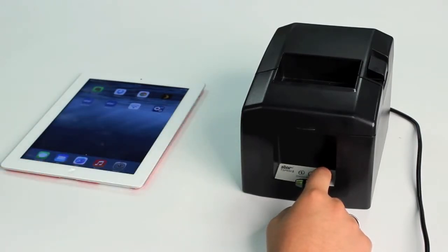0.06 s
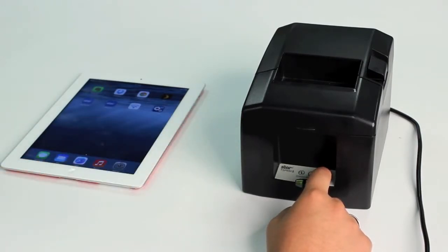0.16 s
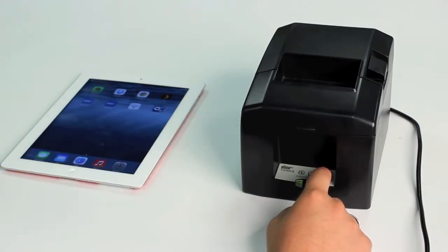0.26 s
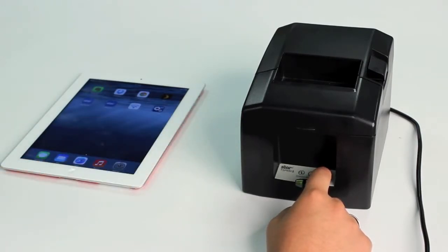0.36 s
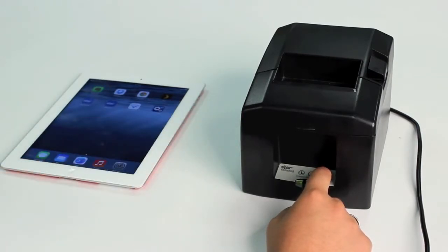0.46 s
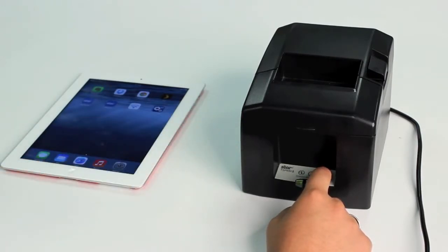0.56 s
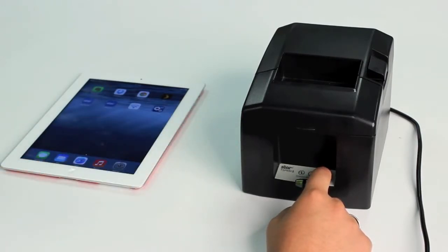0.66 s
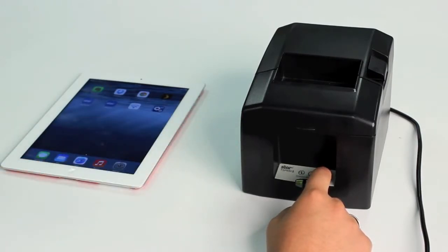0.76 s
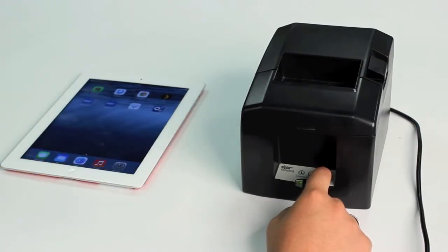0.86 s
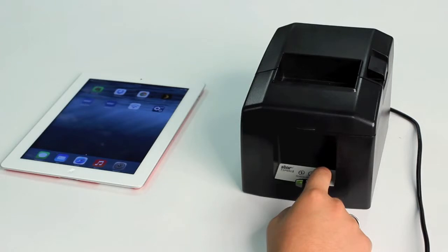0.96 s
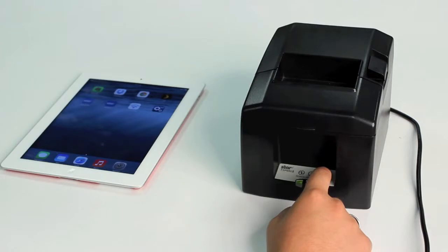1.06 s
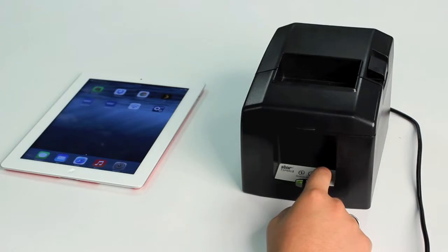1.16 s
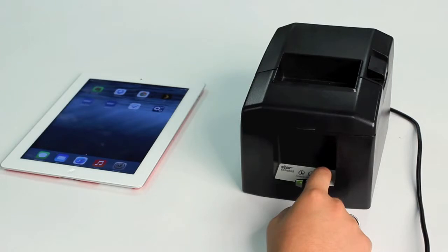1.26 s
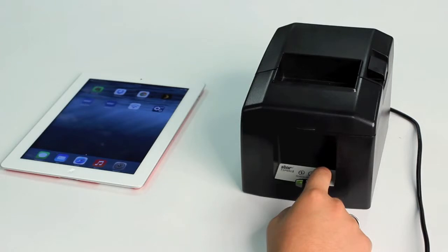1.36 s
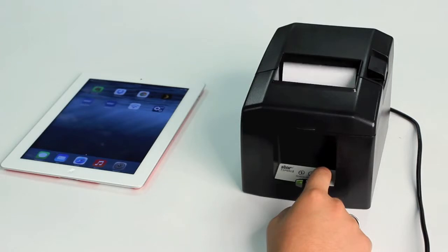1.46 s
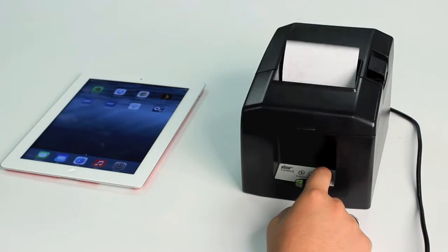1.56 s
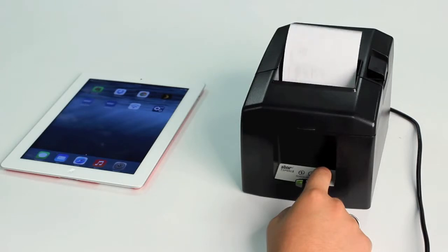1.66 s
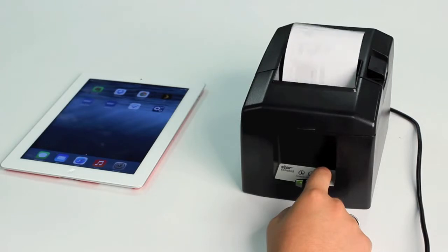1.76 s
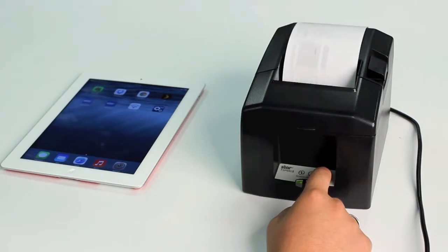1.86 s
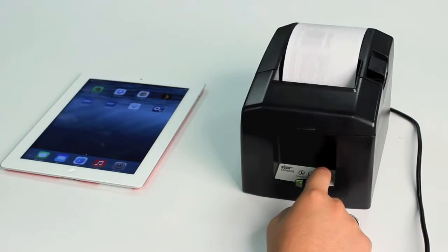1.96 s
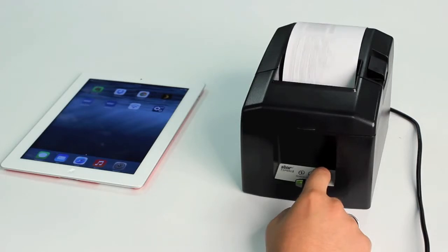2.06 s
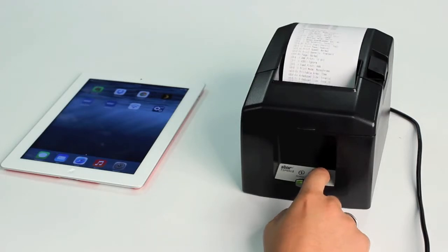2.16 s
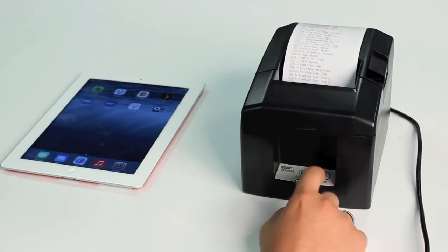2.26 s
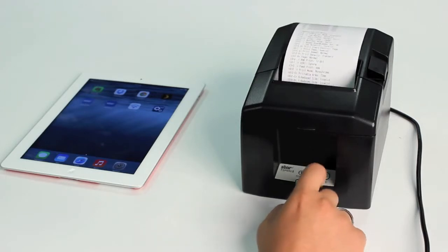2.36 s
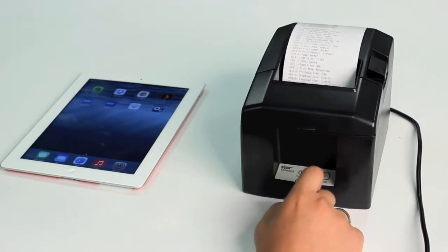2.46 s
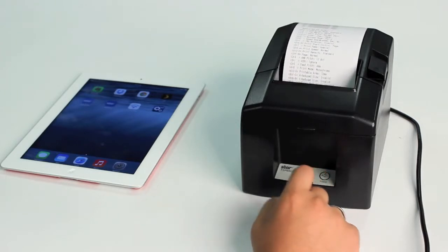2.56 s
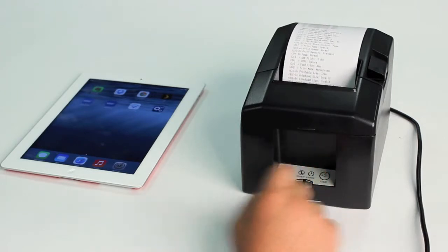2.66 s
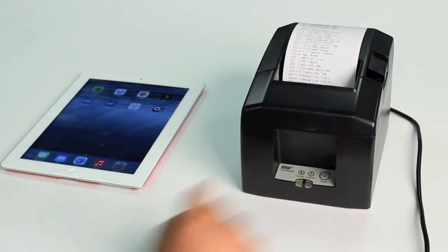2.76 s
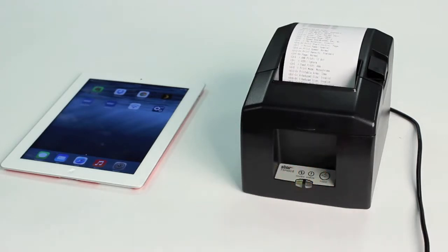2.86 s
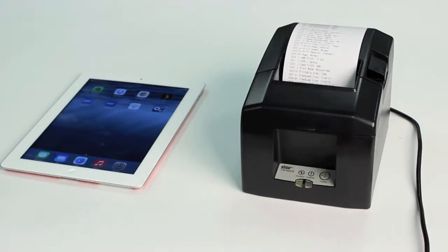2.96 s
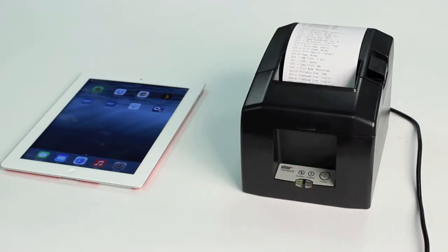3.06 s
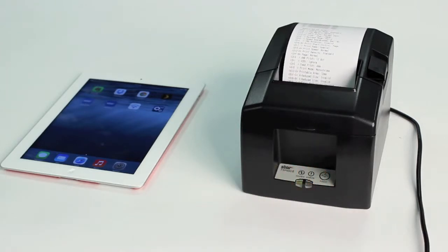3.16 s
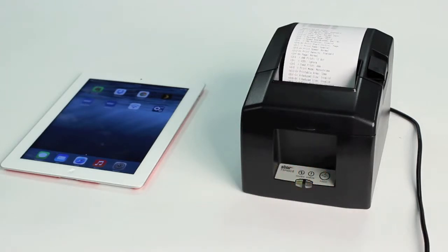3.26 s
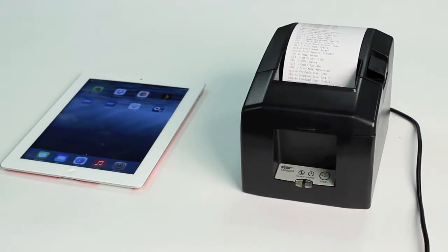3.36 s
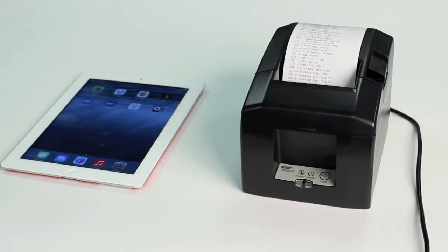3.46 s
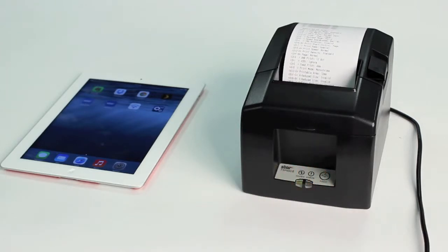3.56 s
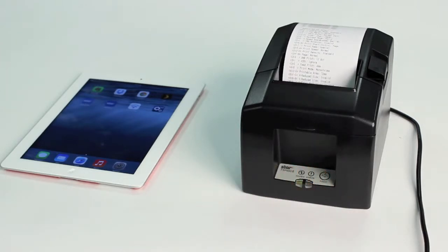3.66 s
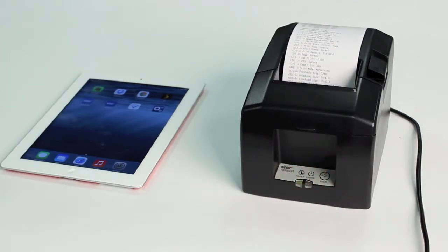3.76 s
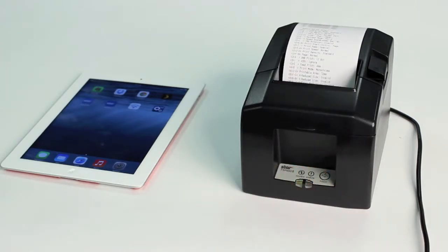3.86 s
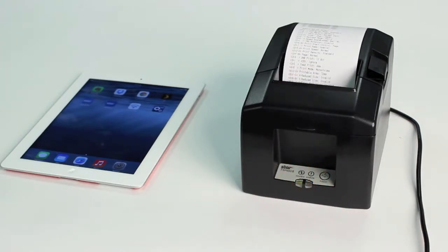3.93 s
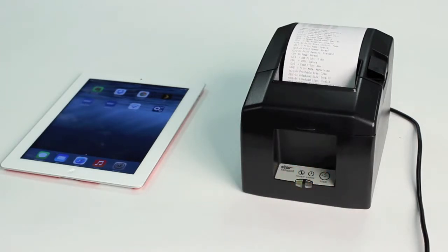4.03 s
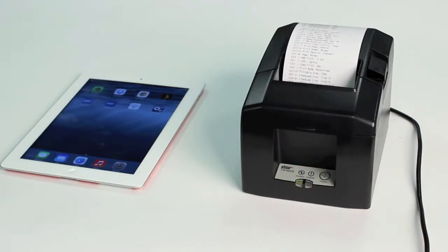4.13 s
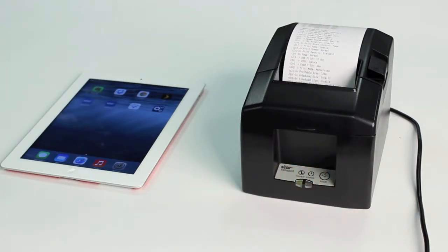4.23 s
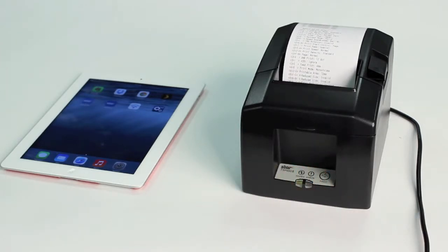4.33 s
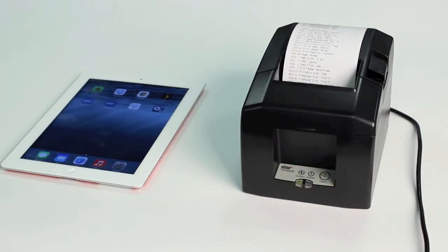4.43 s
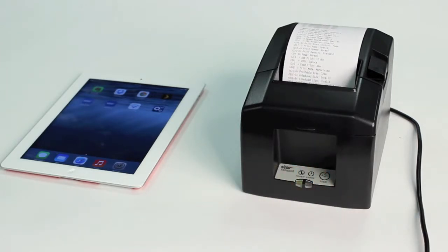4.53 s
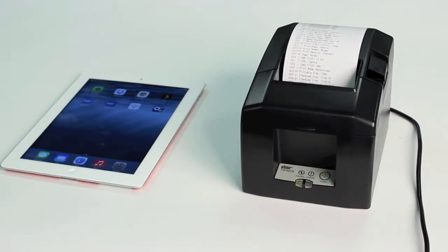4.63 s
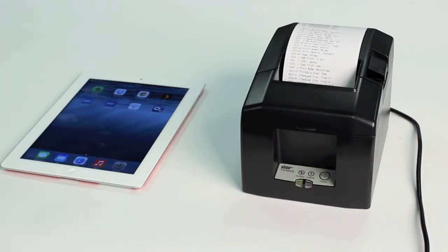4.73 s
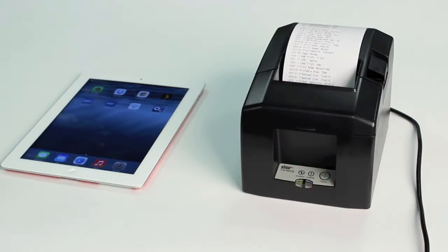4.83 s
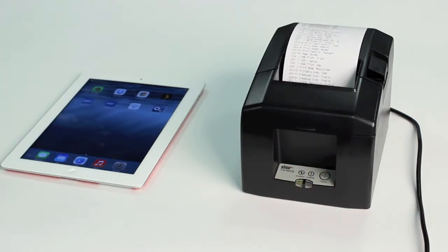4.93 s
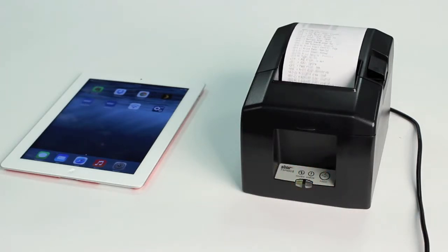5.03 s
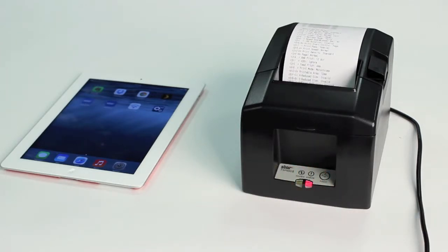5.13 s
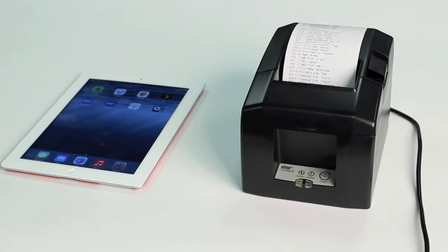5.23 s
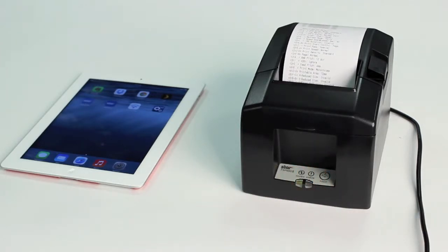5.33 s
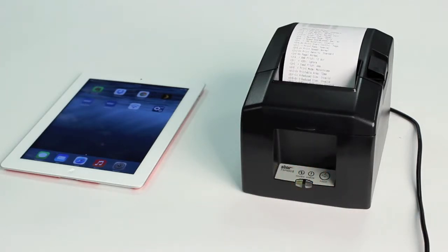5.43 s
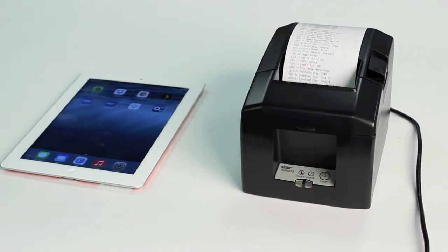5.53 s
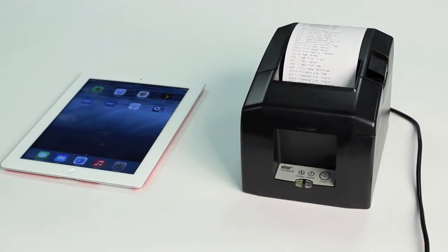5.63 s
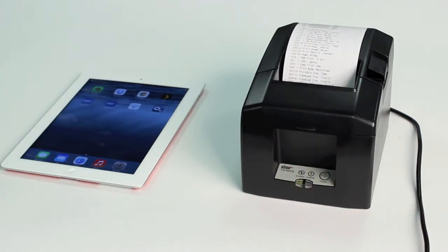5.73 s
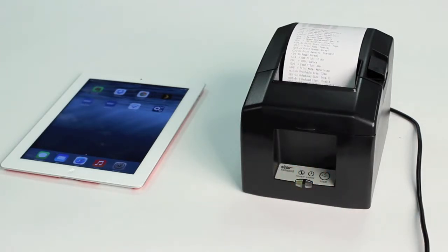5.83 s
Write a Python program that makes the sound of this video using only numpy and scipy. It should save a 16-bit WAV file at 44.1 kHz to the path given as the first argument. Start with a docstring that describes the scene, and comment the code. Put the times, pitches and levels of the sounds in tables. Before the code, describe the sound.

A receipt printer is heard close up on a desk in a small, lightly reflective room, over low ventilation rumble, faint hiss and mains hum. At 0.33 and 0.6 seconds the cutter gives short, metallic geared whirs with clatter. Four brief buzzing feed jogs clack from 0.87 to 1.2. At 1.42 the stepper motor starts with a rough shudder and tiny squeak, rises quickly, and by 1.6 holds a high, raspy whine; it swells in uneven print bursts over airy paper hiss, then slows sharply from 2.2 to 2.33. The blade whirs and crunches through paper at 2.4 and rubs back, with hard bright snaps near 2.55. Faint clatters at 2.74 and 3.13 surround a soft desk bump at 2.87. Quiet hum remains until cutter whirs at 4.3 and 4.56, then buzzing jogs and loud sharp snaps from 4.85 to 5.17, fading into room tone.

```python
"""A thermal receipt printer on a desk in a small room runs its self-test.
The cutter whirs out and back and the feed motor jogs with sharp clacks; the motor runs up and whines as a page
prints. The blade crosses the paper, and after a pause the start-up whirs and clacks come again.
Motors are tones and tooth-rate noise locked to their steps; paper is shaped noise; blows are noise bursts with
casing modes. A room adds reflections; ventilation and mains hum lie behind."""
import sys
import numpy as np
from scipy import signal
from scipy.fft import rfft, irfft
from scipy.io import wavfile

SR = 44100
rng = np.random.default_rng(int(sys.argv[2]) if len(sys.argv) > 2 else 0)


def bounce(signal):
    """Save signal as a 16-bit WAV file at the path given by the first command-line argument."""
    frames = np.transpose(np.atleast_2d(signal))
    limited = np.clip(frames, -1, 1)
    pcm = np.round(limited * 32767).astype(np.int16)
    wavfile.write(sys.argv[1], SR, pcm)


N = 259749
TIME = np.arange(N) / SR

# cutter motor strokes: (start [s], length [s], whir level [dB], hum level [dB], 0 forward or 1 back)
CUTS = [(0.334, 0.081, -33, -33, 0), (0.592, 0.073, -35, -30, 1), (2.326, 0.059, -39.5, -37.5, 1),
        (2.391, 0.0994, -29.5, -40.5, 0), (2.505, 0.14, -35, -38.5, 1), (4.299, 0.091, -34, -58, 0),
        (4.562, 0.069, -34, -32.5, 1)]


def amp(db):
    """Decibels to gain."""
    return 10 ** (np.asarray(db) / 20)


def unit(x):
    """Scales to rms 1."""
    return x / np.sqrt(np.mean(x ** 2) + 1e-20)


def read(points, hz):
    """Reads a spectrum table on a log-frequency axis."""
    f, value = np.transpose(points)
    return np.interp(np.log(hz + 1), np.log(f + 1), value)


def add(mix, s, sound):
    """Mixes a sound in at time s."""
    part = mix[round(s * SR):][:len(sound)]
    part += sound[:len(part)]


def colour(x, points, size=4096):
    """Causal minimum-phase filter with the given spectrum shape; white noise keeps its power."""
    gain = unit(amp(read(points, abs(np.fft.fftfreq(size, 1 / SR)))))
    log_response = np.conj(signal.hilbert(np.log(gain + 1e-5)))
    taps = np.fft.ifft(np.exp(log_response)).real
    return signal.oaconvolve(x, taps[:size // 2])[:len(x)]


def drift(rate_hz):
    """Slow random wander of rms 1: noise under a Gaussian low-pass."""
    lowpass = np.exp(-(np.fft.rfftfreq(N, 1 / SR) / rate_hz) ** 2)
    return unit(irfft(rfft(rng.standard_normal(N)) * lowpass, N))


def resonate(x, hz, width_hz):
    """One resonance, scaled to rms 1."""
    radius = np.exp(-np.pi * width_hz / SR)
    pole = radius * np.exp(2j * np.pi * hz / SR)
    return unit(signal.lfilter([1], [1, -pole], x).real)


def ring(modes, t):
    """Dying modes after a blow."""
    return sum(amp(db - 60 * t / t60_s) * np.sin(2 * np.pi * (hz * t + rng.random()))
               for hz, db, t60_s in modes)


def gate(t, length, rise, fall):
    """Builds up, holds for a length, then dies away."""
    build_up = 1 - np.exp(-np.maximum(t, 0) / rise)
    return build_up * np.exp(-np.maximum(t - length, 0) / fall)


def ramp(start, length):
    """Goes from 0 to 1 over a length of time."""
    return np.clip((TIME - start) / length, 0, 1)


def teeth(turns, sharp):
    """A puff of noise each time a tooth meets the next."""
    return unit(np.exp(-sharp * (turns % 1))) * rng.standard_normal(len(turns))


def step_tones(tones, steps, level_wander_db, level_hz, phase_wander_rad, phase_hz):
    """Tones locked to the motor steps, each wavering in level and phase."""
    return sum(amp(db + level_wander_db * drift(level_hz)) * np.sqrt(2)
               * np.sin(2 * np.pi * k * steps + phase_wander_rad * drift(phase_hz)) for k, db in tones)


def motor_whine(steps, speed):
    """Step tones under load, swelled by each print block; the housing sings most near the full step rate."""
    # whine with sidebands of the 32-step print cycle: (frequency [cycles/step], relative level [dB])
    whine_tones = [(20 / 24, -15), (31 / 32, -10), (32 / 32, -0.57), (28 / 24, -15), (38 / 32, -29),
                   (43 / 32, -29), (44 / 32, -19), (64 / 32, -14.5), (65 / 32, -27), (95 / 32, -23),
                   (96 / 32, -29), (97 / 32, -24)]
    # blocks of print: (start [s], length [s], level [dB])
    print_blocks = [(1.644, 0.044, -31), (1.761, 0.12, -24.5), (1.887, 0.18, -23), (2.095, 0.11, -21),
                    (2.212, 0.039, -13)]
    rise_s, fall_s, blank_db = 0.021, 0.017, -46
    printing = amp(blank_db) + sum(amp(db) * gate(TIME - s, length, rise_s, fall_s)
                                   for s, length, db in print_blocks)
    in_tune = .14 + .86 * np.exp(-(1 - speed) / .06)
    return printing * in_tune * step_tones(whine_tones, steps, 3.7, 120, 0.088, 71)


def gear_tones(steps, speed):
    """Gears and platen sound at fractions of the step rate, growing with the cube of speed."""
    # gears and platen: (frequency [cycles/step], relative level [dB])
    mesh_tones = [(6 / 32, -45.5), (7 / 24, -35.5), (7 / 18, -46), (12 / 24, -43), (14 / 24, -42.5),
                  (16 / 24, -43.5), (21 / 24, -45.5), (28 / 24, -54)]
    level_db = 0.5
    return amp(level_db) * speed ** 3 * step_tones(mesh_tones, steps, 1.5, 20, 0.1, 30)


def gear_rasp(steps, speed):
    """Gear teeth rasp at every step, harder with speed and once the head loads the motor."""
    # rasp spectrum: (frequency [Hz], relative level [dB])
    rasp_spectrum = [(150, -98), (250, -47), (398, -18), (491, -28), (615, -9.5), (935, -37), (1050, -18),
                     (1280, -26), (1340, -23.5), (2100, -5), (2330, -22), (2520, -12), (3350, -18),
                     (4450, -11.5), (9000, -31), (11700, -78), (19800, -120)]
    loaded_db, idle_change_db, db_per_octave = -26, -10, 11  # loaded level is at full speed
    load_s, load_rise_s = 1.593, 0.15
    level_db = loaded_db + db_per_octave * np.log2(speed) + idle_change_db * (1 - ramp(load_s, load_rise_s))
    # each line of print loads the motor, so the rasp throbs
    throb = np.cos(2 * np.pi * steps / 32)
    return amp(level_db) * colour(teeth(steps, sharp=0.87) * (1 + 0.074 * throb), rasp_spectrum)


def paper_hiss(speed):
    """Paper hisses past the head, louder with speed and as it bends over the lid."""
    # paper spectrum: (frequency [Hz], relative level [dB])
    paper_spectrum = [(3000, -26), (6000, -5), (9000, 4), (12500, 5.5), (15000, 2), (17000, 0.5)]
    full_speed_db, db_per_octave = -40.5, 5.5
    bend_s, bend_width_s, bend_db = 2, 0.15, 3.5
    bend = np.exp(-((TIME - bend_s) / bend_width_s) ** 2)
    level_db = full_speed_db + db_per_octave * np.log2(speed) + bend_db * bend
    return amp(level_db) * colour(rng.standard_normal(N) * amp(1.2 * drift(400)), paper_spectrum)


def frame_shudder(steps, speed, braking):
    """The frame shakes at each step, most while the steps are slow."""
    # frame spectrum: (frequency [Hz], relative level [dB])
    frame_spectrum = [(120, -63), (200, -17), (387, -1.5), (654, -0.5), (929, -11.5), (1470, -7.5),
                      (1700, -12), (2110, -23), (2320, -16), (2520, -15.5), (5000, -33), (6500, -61),
                      (11000, -120)]
    crawl_db, full_speed_change_db, brake_extra_db, tone_db = -29, -17.5, 3, -9
    level_db = crawl_db + full_speed_change_db * speed + brake_extra_db * (braking > 0)
    tone = np.sin(2 * np.pi * steps) + np.sin(4 * np.pi * steps)
    shaking = teeth(steps, sharp=4.7) + amp(tone_db) * tone
    return amp(level_db) * colour(shaking, frame_spectrum)


def feed():
    """The stepper runs up, whines through its gears as the page prints, and runs down."""
    start_s, cruise_s, brake_s, stop_s = 1.424, 1.612, 2.2, 2.325
    slow_hz, full_hz = 360, 2172.6  # step rates
    braking = ramp(brake_s, stop_s - brake_s)
    # the power makes braking begin gently
    progress = ramp(start_s, cruise_s - start_s) - braking ** 1.2
    rate_hz = slow_hz + (full_hz - slow_hz) * progress
    speed = rate_hz / full_hz
    # the rotor hunts about its step while the speed changes
    hunting = .06 * np.sqrt(abs(1 - speed)) + .1 * np.sqrt(braking)
    steps = np.cumsum(rate_hz * (1 + .0006 * drift(65) + hunting * drift(170))) / SR
    running = gate(TIME - start_s, 0.888, rise=0.0022, fall=0.0091)
    tones = motor_whine(steps, speed) + gear_tones(steps, speed)
    noises = gear_rasp(steps, speed) + paper_hiss(speed) + frame_shudder(steps, speed, braking)
    return running * (tones + noises)


def jogs():
    """A few slow steps hum in the frame and rattle the gears; the rotor chatters as it stops."""
    # feed jogs: (start [s], length [s], step rate [Hz], hum [dB], rattle [dB], rotor ring [dB])
    jog_rows = [(0.875, 0.036, 410, -29, -21, -13), (0.974, .034, 420, -20.5, -36.5, -22.5),
                (1.07, .054, 420, -21, -29.5, -18.5), (1.19, .016, 406, -25.5, -19.5, -21.5),
                (4.846, .042, 413, -26, -21, -19.5), (4.9436, 0.048, 416, -27, -19.5, -33),
                (5.0422, 0.048, 400, -21, -21, -40), (5.162, .018, 346, -27, -27, -29)]
    # hum harmonics: (multiple of step rate, relative level [dB])
    hum_harmonics = [(1, -4), (2, -14), (3, -34), (4, -25.5)]
    # rattle spectrum: (frequency [Hz], relative level [dB])
    rattle_spectrum = [(120, -38), (200, -5.5), (283, -11), (409, -10.5), (635, 3), (899, -24),
                       (1020, -2.5), (1560, -13), (1740, -7.5), (2960, -4.5), (3560, -18.5), (4860, -12),
                       (7830, -30.5), (14100, -33), (16000, -40)]
    # rotor resonances: (frequency [Hz], width [Hz], relative level [dB])
    rotor_modes = [(701, 27, -0.5), (613, 89, -5.5), (1160, 61, -6.5)]
    hunt, rattle_fade_db = .018, -8  # hunt: rms share of step rate; fade: over one jog
    out, t = np.zeros(N), np.arange(SR // 4) / SR
    for s, length, hz, hum_db, rattle_db, ring_db in jog_rows:
        steps = np.cumsum(hz * (1 + hunt * drift(90)[:len(t)])) / SR
        hum = sum(amp(db) * np.sqrt(2) * np.sin(2 * np.pi * k * steps) for k, db in hum_harmonics)
        fade_db = rattle_fade_db * np.minimum(t / length, 1)
        rattle = teeth(steps, sharp=3.3) * amp(rattle_db + fade_db)
        rotor = sum(amp(db) * resonate(rng.standard_normal(len(t)), f, width_hz)
                    for f, width_hz, db in rotor_modes)
        add(out, s, amp(hum_db) * hum * gate(t, length + 0.0072, rise=0.012, fall=0.01))
        add(out, s, colour(rattle * gate(t, length, rise=0.0019, fall=0.0024), rattle_spectrum))
        add(out, s + length, amp(ring_db) * rotor * gate(t, 0, rise=0.013, fall=0.014))
    return out


def cutter():
    """A small geared motor drives the blade: metal whir, a growl in the case and a hum in the desk."""
    # whir and growl spectra: (frequency [Hz], relative level [dB])
    whir_spectrum = [(700, -22), (1050, -2), (1400, 8.5), (1950, 0.5), (2700, 7.5), (3400, -7.5), (4700, 4),
                     (5600, -86), (9000, -6), (16000, -24)]
    growl_spectrum = [(60, -38), (130, -0.5), (210, -16.5), (310, 2.5), (440, 1.5), (530, -6), (750, -1),
                      (900, -13.5), (1100, -5), (1500, -22), (2500, -53)]
    # blade and rack resonances by direction: (frequency [Hz], width [Hz], relative level [dB])
    forward_rings = [(2410, 130, -9), (2843, 69, -2), (4930, 120, -24), (7700, 40, -18.5),
                     (10140, 870, -17.5)]
    back_rings = [(2640, 46, -3), (2846, 110, -19.5), (4600, 17, -8.5), (7440, 440, -15.5),
                  (10230, 57, -15), (10800, 450, -18)]
    motor_hz, whir_db, metal_db = 135, -4, -4
    ends_db, growl_first_db, growl_last_db = -3.5, -2, 5  # ends against mid travel, growl against the stroke
    whir, metal, growl, hum = np.zeros((4, N))
    t = np.arange(SR // 4) / SR
    for s, length, stroke_db, hum_db, back in CUTS:
        travel = np.minimum(t / length, 1)
        growl_db = growl_first_db + (growl_last_db - growl_first_db) * travel
        level = amp(stroke_db + ends_db * (2 * travel - 1) ** 2)
        level = level * gate(t, length, rise=0.00048, fall=0.0055)
        uneven_load = amp(5.0 * drift(160)[:len(t)])
        scrape = unit(teeth(motor_hz * t, sharp=0.52) * uneven_load)
        rings = back_rings if back else forward_rings
        singing = sum(amp(db) * resonate(scrape, hz, width_hz) for hz, width_hz, db in rings)
        add(whir, s, level * scrape)
        add(metal, s, level * singing)
        add(growl, s, level * amp(growl_db) * teeth(motor_hz * t, sharp=1.5))
        tone = np.sin(2 * np.pi * motor_hz * t)
        add(hum, s, amp(hum_db) * tone * gate(t, length, rise=0.017, fall=0.017))
    whir = amp(whir_db) * colour(whir, whir_spectrum)
    return whir + amp(metal_db) * metal + colour(growl, growl_spectrum) + hum


def shear():
    """The blade shears the paper, then rubs back along the cut edge: fibres part in quick clumps."""
    # blade passes: (start [s], length [s], level [dB])
    passes = [(2.413, 0.075, -28), (2.531, 0.063, -28.5)]
    # shear spectrum: (frequency [Hz], relative level [dB])
    shear_spectrum = [(500, -10), (1100, -12.5), (2050, 9), (2300, -6), (2800, -2), (3500, -1.5), (4500, 3),
                      (5600, -7), (6500, -1), (8000, -10.5), (16000, -17)]
    level = sum(amp(db) * gate(TIME - s, length, rise=0.0017, fall=0.013) for s, length, db in passes)
    fibres = unit(rng.standard_normal(N) * amp(2.7 * drift(700)))
    return colour(level * fibres, shear_spectrum)


def squeaks():
    """Dry sliding parts give short fuzzy whistles: the platen once, the cutter around each forward stroke."""
    cutter_hz, cutter_db, cutter_s, lead_s = 11100, -50, .008, .007
    width_hz = 600  # of each of two equal resonances in series
    rows = [(1.474, 0.017, 4250, -43.5)]  # platen: (start [s], length [s], pitch [Hz], level [dB])
    for s, length, _, _, back in CUTS:
        if not back:
            rows += [(start, cutter_s, cutter_hz, cutter_db) for start in (s - lead_s, s + length)]
    out, t = np.zeros(N), np.arange(SR // 8) / SR
    for s, length, hz, db in rows:
        whistle = resonate(rng.standard_normal(len(t)), hz, width_hz)
        whistle = resonate(whistle, hz, width_hz)
        add(out, s, amp(db) * whistle * gate(t, length, rise=.002, fall=0.0027))
    return out


def blows(rows, thud_db, tick_db, rise):
    """Each blow is a bright tick, a crack of the mechanism and a thud, and leaves the casing ringing."""
    # tick, crack and thud spectra: (frequency [Hz], relative level [dB])
    tick_spectrum = [(2000, -35), (4000, 6), (5200, 5), (7000, -3.5), (10000, -5), (16000, -10.5)]
    crack_spectrum = [(700, -34), (1400, -22.5), (2050, 0.5), (2750, 2), (3400, -5.5), (4500, -8),
                      (6000, -20), (10000, -27)]
    thud_spectrum = [(100, -40.5), (250, -10.5), (420, -0.5), (700, -7.5), (900, -15), (1150, -11),
                     (2000, -19), (4000, -79)]
    # casing modes: (frequency [Hz], relative level [dB], t60 [s])
    casing_modes = [(382, 7.5, 0.057), (446, -4.5, 0.16), (637, 9, 0.11), (711, 4, 0.079),
                    (980, -24, 0.071), (1426, 0, 0.096), (2040, -4, 0.084), (2990, -24, 0.06)]
    after_db, after_s = -18, 0.0093  # slower second decay
    # harder blows are brighter: the thud grows by only a share of the level; stiffer parts tick more
    thud_share, tick_db_per_octave = 0.31, 3.5
    tick, crack, thud, casing = np.zeros((4, N))
    t = np.arange(SR // 5) / SR
    for s, db, pitch, decay in rows:
        contact, since = np.minimum(t / rise, 1) ** 2, np.maximum(t - rise, 0)
        blow = contact * (np.exp(-since / decay) + amp(after_db) * np.exp(-since / after_s))
        weight = amp(thud_db + thud_share * db)
        tick_noise, crack_noise, thud_noise = rng.choice([-1., 1.], (3, len(t)))
        add(tick, s, amp(db + tick_db + tick_db_per_octave * np.log2(pitch)) * blow * tick_noise)
        # smaller, stiffer parts crack at a higher pitch
        pitched = [(hz * pitch, level_db) for hz, level_db in crack_spectrum]
        add(crack, s, amp(db) * colour(blow * crack_noise, pitched))
        add(thud, s, weight * contact * np.exp(-since / (decay + 0.0074)) * thud_noise)
        add(casing, s, weight * contact * ring(casing_modes, t))
    return colour(tick, tick_spectrum) + crack + amp(-3.0) * colour(thud, thud_spectrum) + amp(-13.0) * casing


def clacks():
    """Loose gears clatter taking up play, feed gears jolt the frame, hard parts snap against their stops."""
    # clatters and knocks: (time [s], level [dB], decay [s])
    clatter_rows = [(.352, -39, .003), (.371, -36, 0.0097), (0.5963, -24, 0.0054), (0.876, -22, 0.01),
                    (.916, -24.5, 0.0094), (2.3924, -27, 0.003), (2.738, -42, 0.0069), (3.126, -42, 0.012),
                    (4.3094, -34, 0.0027), (4.3198, -39, .003), (4.35, -33.5, 0.0052),
                    (4.376, -32.5, 0.0058), (4.568, -27.5, 0.0063), (4.618, -54, 0.0024),
                    (4.849, -19, .0025)]
    knock_rows = [(0.974, -26.5, 0.0008), (1.0815, -17, 0.0041), (1.2013, -17.5, 0.0049),
                  (1.425, -40, 0.0022), (5.0524, -16.5, .0047), (5.171, -16, 0.0029)]
    # snaps: (time [s], level [dB], pitch [factor])
    snap_rows = [(2.3615, -28.5, 2.86), (2.5505, -8, 1), (2.56, -17, 1.34), (2.5924, -11.5, .92),
                 (4.8861, -11, 0.93), (4.892, -7.5, 0.9), (4.899, -10, 0.83), (5.091, -6, 1),
                 (5.1006, -7, 1.62)]
    snap_decay_s = .0016
    clatters = [(s, db, 1, decay) for s, db, decay in clatter_rows]
    knocks = [(s, db, 1, decay) for s, db, decay in knock_rows]
    snaps = [(s, db, pitch, snap_decay_s) for s, db, pitch in snap_rows]
    return (blows(clatters, thud_db=-24, tick_db=-4.5, rise=0.0023)
            + blows(knocks, thud_db=-12.5, tick_db=0.0, rise=0.0019)
            + blows(snaps, thud_db=-23, tick_db=-7, rise=0.00054))


def bumps():
    """A soft, dull knock in the desk top as the hand comes away."""
    # bumps: (time [s], level [dB], decay [s])
    bump_rows = [(2.868, -28, 0.0082)]
    # desk spectrum: (frequency [Hz], relative level [dB])
    desk_spectrum = [(120, -35), (270, 1.5), (480, -2.5), (600, -13), (760, -6.5), (1100, -26), (1400, -32),
                     (4000, -64)]
    out, t = np.zeros(N), np.arange(SR // 8) / SR
    for s, db, decay in bump_rows:
        add(out, s, amp(db) * gate(t, 0.0026, rise=0.0013, fall=decay) * rng.standard_normal(len(t)))
    return colour(out, desk_spectrum)


def room(x):
    """Quick reflections from the desk, then a tail in which each band dies at its own speed."""
    # decay: (frequency [Hz], t60 [s])
    decay_times = [(120, 0.73), (400, 0.99), (1000, 0.39), (3000, 0.85), (6000, 0.99), (15000, 0.067)]
    # tail spectrum: (frequency [Hz], relative level [dB])
    tail_spectrum = [(100, 11.5), (400, 0.5), (1000, 4), (2500, -6), (6000, -11), (15000, -1.5)]
    wet_db, early_db = -15, -13
    hz, t, bands = signal.stft(rng.standard_normal(SR), SR, nperseg=256)
    decay = amp(-60 * t / read(decay_times, hz)[:, None]) * (1 - np.exp(-t / 0.0013))
    tail = signal.istft(bands * decay, SR, nperseg=256)[1][:SR]
    tail = colour(tail / np.linalg.norm(tail), tail_spectrum)
    t = np.arange(SR) / SR
    sparse = rng.random(SR) < 900 / SR  # about 900 reflections per second
    early = rng.standard_normal(SR) * sparse * np.exp(-t / 0.0091) * (t > .002)
    response = amp(wet_db) * tail + amp(early_db) * early / np.linalg.norm(early)
    return x + signal.fftconvolve(x, response)[:N]


def background():
    """Ventilation rumble and hiss as shaped noise, with a mains hum wavering in level and phase."""
    # ventilation spectrum: (frequency [Hz], relative level [dB])
    air_spectrum = [(12, -33), (20, -5), (91, -5.5), (120, 1.5), (146, -8.5), (177, -5.5), (204, -9),
                    (241, -6), (328, -16), (472, -17), (678, -23.5), (976, -21.5), (1150, -26),
                    (1960, -26.5), (16000, -38)]
    air_db, hum_db, hum_hz = -44, -49, 121
    hum = amp(2 * drift(4.5)) * np.sin(2 * np.pi * hum_hz * TIME + .5 * drift(15))
    air = colour(rng.standard_normal(N), air_spectrum, size=16384)
    return amp(air_db) * air + amp(hum_db) * unit(hum)


def scene():
    """The printer in its room."""
    printer = feed() + jogs() + cutter() + shear() + squeaks() + clacks() + bumps()
    return (room(printer) + background())[None]


def record(dry):
    """Full-scale clipping, then the band limit."""
    edge_hz = 16050
    lowpass = signal.firwin(511, edge_hz, window=("kaiser", 9), fs=SR)
    return signal.oaconvolve(np.clip(dry, -1, 1), lowpass[None], "same")


dry = scene()
out = record(dry)
bounce(out)
```